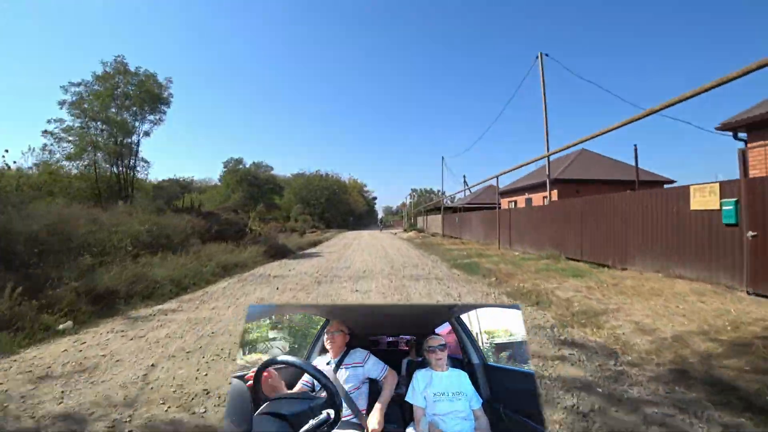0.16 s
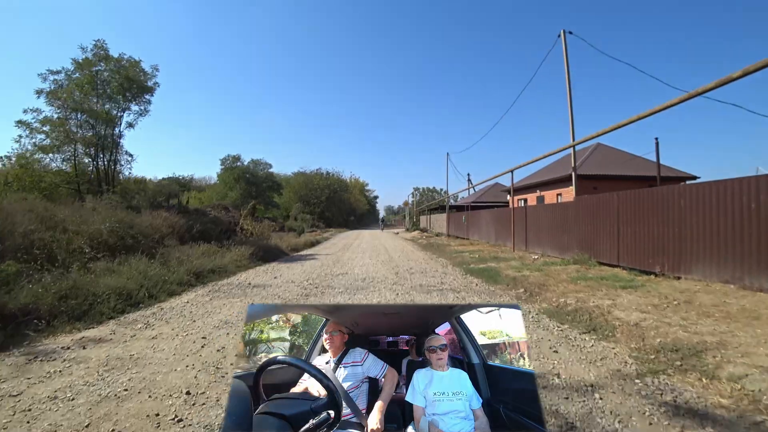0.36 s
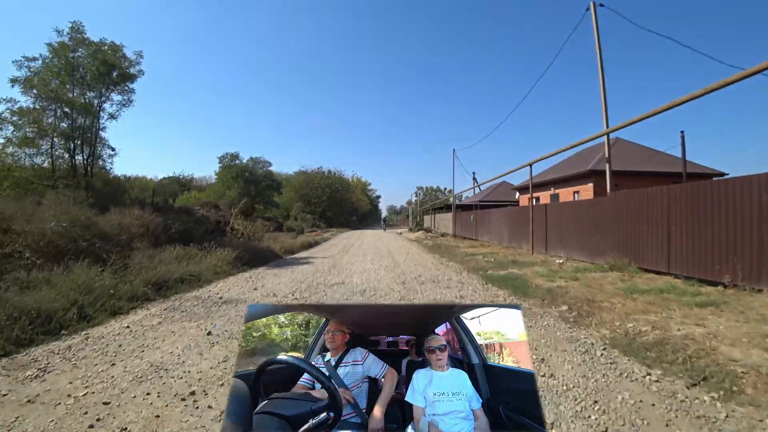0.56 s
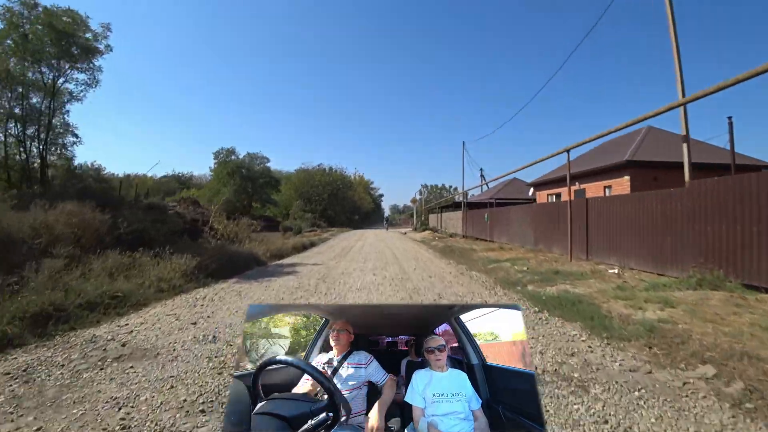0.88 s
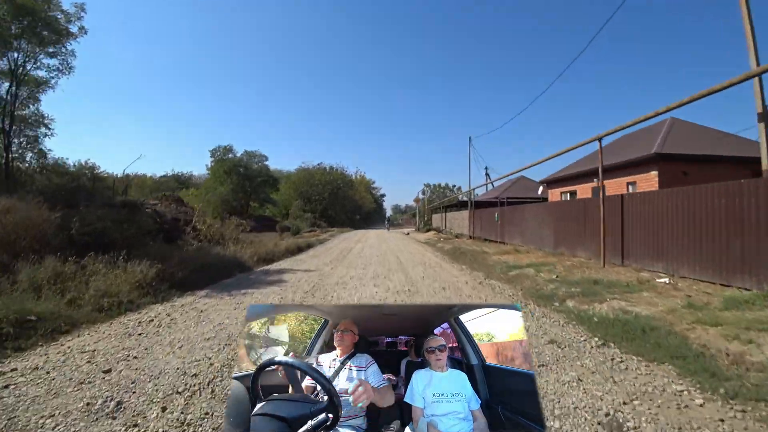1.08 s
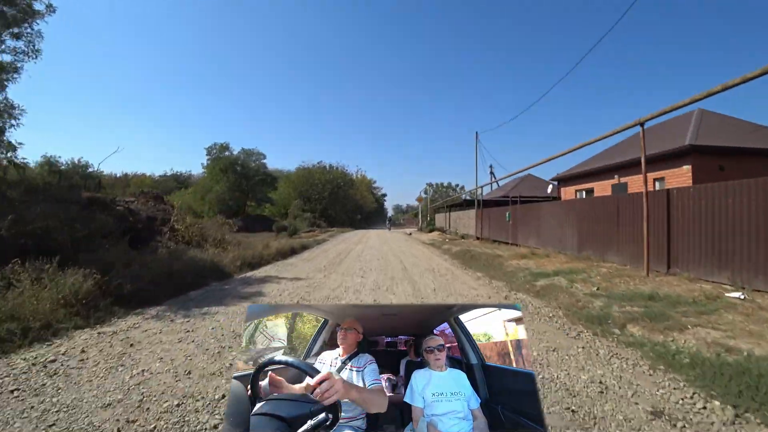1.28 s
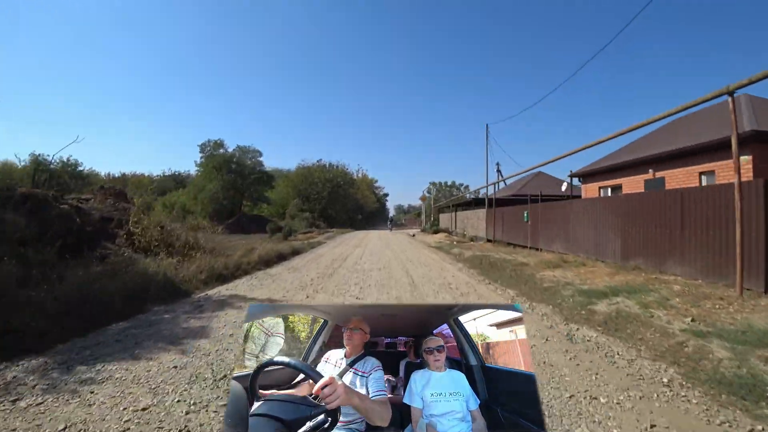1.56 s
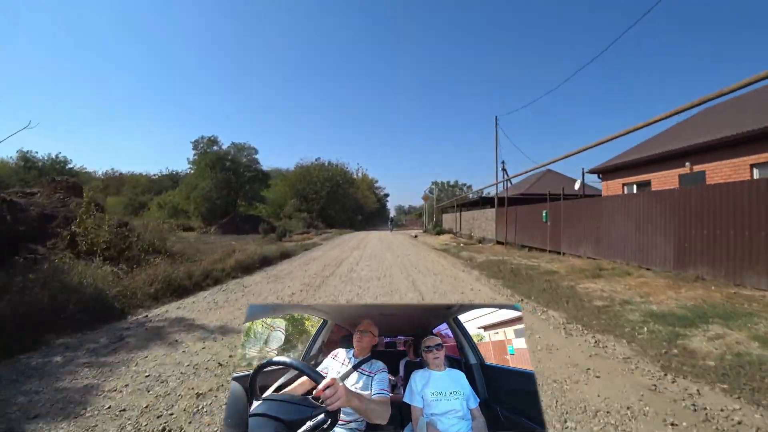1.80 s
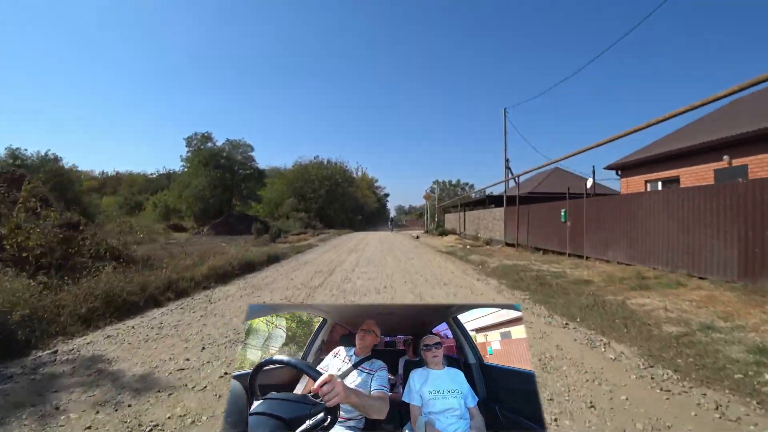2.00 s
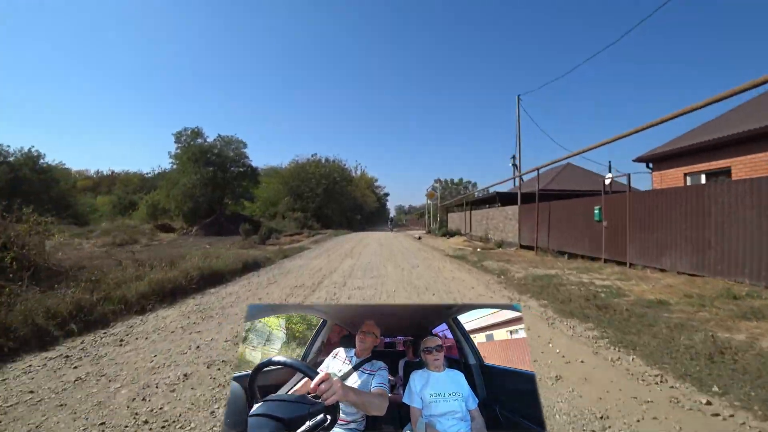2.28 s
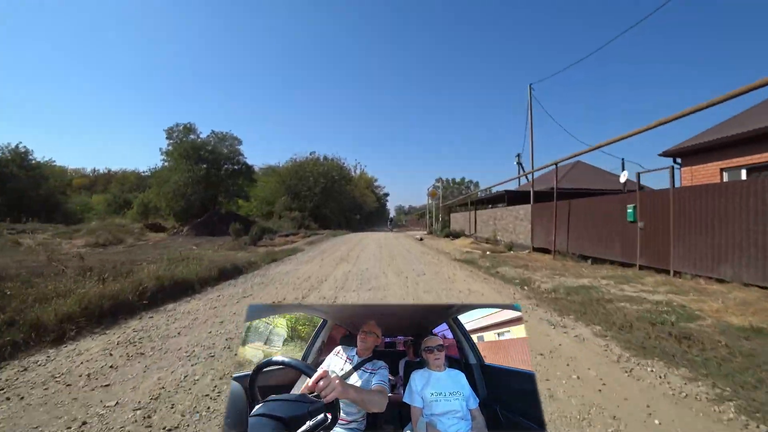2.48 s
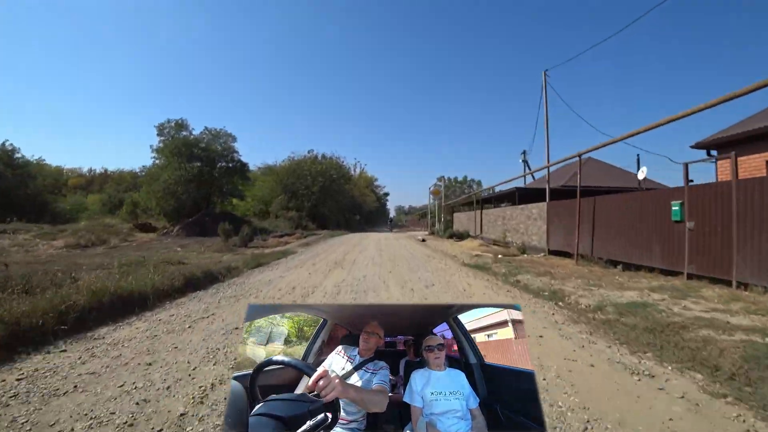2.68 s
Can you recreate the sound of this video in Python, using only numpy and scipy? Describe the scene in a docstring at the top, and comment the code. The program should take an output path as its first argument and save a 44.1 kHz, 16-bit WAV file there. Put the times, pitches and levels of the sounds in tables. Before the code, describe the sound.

A small car drives slowly along a gravel street, its deep boom and tyre rumble steady, while stones crack and tick against the floor pan; low air thumps buffet the microphone, mostly on the left.

```python
"""Inside a small car rolling slowly over gravel: resonant body boom, noise-like tyre and engine rumble, crunch.
Stones knock and crack on the floor pan (noise bursts plus ringing modes); a loose metal part jingles.
Filtered bursts make short low surges of the rumble; bumps hum as short low tones. Low noise buffeting differs
between the two microphone ports; at listed times the recorder narrows this low sound towards mono for a
moment, then reopens it. Bell-shaped thumps fall mostly on the left."""
import sys
import numpy as np
from scipy import signal
from scipy.fft import rfft, irfft
from scipy.io import wavfile
from scipy.ndimage import uniform_filter1d

SR = 44100
rng = np.random.default_rng(int(sys.argv[2]) if len(sys.argv) > 2 else 0)


def wrap_up_sound(samples):
    """Save the sound to the file named by the first command line argument, as 16-bit audio."""
    columns = np.atleast_2d(samples).T
    # keep every value between -1 and 1, then stretch to whole-number steps
    tamed = np.clip(columns, -1, 1)
    steps = np.round(tamed * 32767).astype(np.int16)
    wavfile.write(sys.argv[1], SR, steps)


def gain_from_decibels(decibels):
    """Convert decibel values to linear amplitude factors."""
    exponent = np.asarray(decibels, float) / 20
    return 10 ** exponent


N = 125685


def unit(x):
    """Scale to rms 1."""
    return x / np.sqrt(np.mean(x ** 2))


def decay(t, t60_s):
    """Exponential decay, 60 dB in t60_s."""
    return 1000.0 ** (-t / t60_s)


def log_axis(x):
    """log2 frequency of each rfft bin, offset by 1 Hz to keep DC finite."""
    return np.log2(np.arange(len(x) // 2 + 1) * SR / len(x) + 1)


def colour(x, table):
    """Filter by (frequency [Hz], gain [dB]) points joined on a log-frequency axis."""
    hz, db = np.array(table).T
    gain = gain_from_decibels(np.interp(log_axis(x), np.log2(hz), db))
    return irfft(rfft(x) * gain, len(x))


def bell_filter(x, centre_hz, above_octaves, below_octaves):
    """Lopsided Gaussian band-pass on the log-frequency axis."""
    off = log_axis(x) - np.log2(centre_hz)
    width = np.where(off > 0, above_octaves, below_octaves)
    return irfft(rfft(x) * np.exp(-0.5 * (off / width) ** 2), len(x))


def bell(t, width):
    """Gaussian pulse, width at half height."""
    return np.exp(-4 * np.log(2) * (t / width) ** 2)


def walk(per_s):
    """Smoothed random steps, per_s new levels a second."""
    k = SR // per_s
    steps = np.repeat(rng.standard_normal(N // k + 1), k)
    return uniform_filter1d(uniform_filter1d(steps, k), k)[:N]


def ring(modes, t):
    """Decaying modes; random phase, strength and slight detuning at each blow."""
    out = 0
    for hz, db, t60_s in modes:
        strength, phase, detune = rng.random(3) - 0.5
        tone = np.sin(2 * np.pi * (hz * (1 + 0.015 * detune) * t + phase))
        out = out + gain_from_decibels(db + 8 * strength) * tone * decay(t, t60_s)
    return out


def add(out, x, start_s):
    """Mix x into out at start_s, cut at the end."""
    i = int(start_s * SR)
    out[i:i + len(x)] += x[:N - i]


# road load: (time [s], boom level [dB], rumble level [dB], crunch level [dB])
ROAD_LOAD = [(0.0, -26, -9.5, -67), (0.018, -16.5, -25, -49.5), (0.35, -17.5, -23.5, -49.5),
             (0.54, -17, -23.5, -48.5), (0.59, -17.5, -23.5, -47.5), (1.09, -16, -25, -48.5),
             (1.19, -18.5, -27, -49.5), (1.45, -16.5, -24.5, -48), (1.7, -18.5, -22.5, -47.5),
             (1.99, -19, -24, -47), (2.06, -20, -17, -47.5), (2.11, -24.5, -23, -45.5),
             (2.16, -13.5, -26.5, -49.5), (2.22, -14, -23, -47.5), (2.29, -27, -22, -48),
             (2.36, -14.5, -23, -49.5), (2.44, -16.5, -23.5, -49), (2.54, -16.5, -27.5, -49.5),
             (2.61, -27.5, -24, -48.5), (2.65, -19, -27, -49), (2.85, -24.5, -25.5, -50)]


def road(column):
    """Gain of one road-load column, interpolated in dB."""
    table = np.array(ROAD_LOAD)
    return gain_from_decibels(np.interp(np.arange(N) / SR, table[:, 0], table[:, column]))


# body resonances: (frequency [Hz], bandwidth [Hz], level [dB])
BODY_RESONANCES = [(20.9, 9.8, 5), (29.3, 12.5, 0), (36.8, 4.2, -6.5), (65.3, 24, -13)]


def boom():
    """The road shakes low body resonances: noise through peak filters."""
    out = 0
    for hz, width_hz, db in BODY_RESONANCES:
        b, a = signal.iirpeak(hz, hz / width_hz, SR)
        out = out + gain_from_decibels(db) * unit(signal.lfilter(b, a, rng.standard_normal(N)))
    band = signal.butter(2, [15, 80], "band", fs=SR, output="sos")
    return unit(signal.sosfilt(band, out)) * road(column=1)


# rumble spectrum: (frequency [Hz], density [dB per Hz])
RUMBLE_SPECTRUM = [(35, 1), (60, 0), (92, 0), (113, -6), (152, -0.5), (335, -12), (368, -14.5), (439, -18),
                   (476, -18.5), (1000, -35), (1300, -45), (2200, -120)]


def rumble():
    """Tyre and engine rumble through the floor: coloured noise flickering in level."""
    flicker = gain_from_decibels(1.4 * (walk(per_s=20) + walk(per_s=40)))
    return unit(colour(rng.standard_normal(N) * flicker, RUMBLE_SPECTRUM)) * road(column=2)


# crunch spectrum: (frequency [Hz], density [dB per Hz])
CRUNCH_SPECTRUM = [(410, -81), (700, -6), (1010, -1), (1060, -9), (1180, -3.5), (1340, -10), (1740, -6.5),
                   (2170, -16.5), (2500, -13), (3000, -17), (10300, -31), (15700, -46)]
GRAINS_PER_S, GRAIN_T60_S = 400, 0.045
GRAIN_SPREAD_DB, GRAIN_TOP_DB = 9, 11
GRAIN_DB = -12  # all tails, re hiss


def crunch():
    """Gravel under the tyres: flickering hiss plus random grains with short noise tails."""
    grain_db = np.minimum(GRAIN_SPREAD_DB * rng.exponential(size=N), GRAIN_TOP_DB)
    hits = (rng.random(N) < GRAINS_PER_S / SR) * gain_from_decibels(grain_db)
    tails = signal.lfilter([1], [1, -decay(1 / SR, GRAIN_T60_S)], hits)
    envelope = gain_from_decibels(walk(per_s=12)) + gain_from_decibels(GRAIN_DB) * unit(tails)
    return unit(colour(rng.standard_normal(N) * envelope, CRUNCH_SPECTRUM)) * road(column=3)


# port-difference spectrum: (frequency [Hz], density [dB per Hz])
BUFFET_SPECTRUM = [(8.8, -30), (15, 4), (49, 0.5), (236, -7.5), (463, -23), (520, -28), (875, -26),
                   (1060, -42), (1290, -35), (1500, -43), (1950, -79), (3300, -120)]
BUFFET_DB = -21  # before flicker and folds
LINKED_DB, LINKED_LEAD_RAD = -2.5, 1  # part following the centre sound


def buffeting(centre):
    """Low pressure difference between the ports: flickering noise plus phase-led centre sound."""
    linked = (signal.hilbert(centre) * np.exp(1j * LINKED_LEAD_RAD)).real
    linked = signal.sosfiltfilt(signal.butter(2, 900, fs=SR, output="sos"), linked)
    free = unit(colour(rng.standard_normal(N), BUFFET_SPECTRUM))
    return (free * gain_from_decibels(BUFFET_DB) + gain_from_decibels(LINKED_DB) * linked) * gain_from_decibels(0.74 * walk(per_s=20))


# narrowing of the low sound: (start [s], length [s], level change of the difference [dB])
STEREO_FOLDS = [(0, 0.046, -14.5), (0.204, 0.063, -14.5), (0.348, 0.022, -1), (0.44, 0.02, -4),
                (0.684, 0.05, -11), (0.84, 0.026, -4), (0.932, 0.051, -15), (1.022, 0.055, -15),
                (1.313, 0.054, -14), (1.423, 0.046, -4.5), (1.556, 0.014, -19), (1.639, 0.032, -12),
                (1.721, 0.032, -15), (1.857, 0.028, -6), (1.925, 0.025, -20), (2.078, 0.052, -12),
                (2.157, 0.03, -22), (2.271, 0.031, -11), (2.357, 0.048, -15)]
FOLD_FALL_S, FOLD_RISE_S = 0.0059, 0.022


def stereo_folds():
    """The recorder narrows the low sound towards mono, then reopens it: gain of its port difference."""
    t, fold_db = np.arange(N) / SR, 0
    for start_s, length_s, change_db in STEREO_FOLDS:
        corners_s = [-FOLD_FALL_S, 0, length_s, length_s + FOLD_RISE_S]
        fold_db = fold_db + change_db * np.interp(t - start_s, corners_s, [0, 1, 1, 0])
    return gain_from_decibels(fold_db)


# port-difference thumps: (peak time [s], level [dB], push +1 or pull -1, width [ms])
AIR_THUMPS = [(0.1977, 2.5, 1, 4.8), (0.3313, 0.3, 1, 2.7), (0.4066, -7.5, -1, 3.6), (0.4235, -4.1, 1, 4.1),
              (0.4878, -7.4, 1, 3.1), (0.5134, -6.9, -1, 1.9), (0.521, -6.5, -1, 1.7),
              (0.5382, -3.6, 1, 2.4), (0.5628, -7.0, -1, 2.2), (0.6043, -5.7, 1, 3.4),
              (0.6174, -5.5, -1, 5.5), (0.6389, -4.5, 1, 3.2), (0.6759, -3.4, 1, 4.5),
              (0.8179, 4.3, 1, 4.9), (0.8839, -6.2, -1, 3.3), (0.9354, -2.2, -1, 6.8),
              (1.0187, 0.9, 1, 6.0), (1.3091, -3.0, -1, 5.1), (1.4012, -5.7, -1, 2.5),
              (1.5698, -2.5, -1, 4.8), (1.624, -0.0, -1, 5.6), (1.7061, 0.9, -1, 4.0),
              (1.8481, -3.5, 1, 2.7), (1.9102, -0.8, 1, 5.3), (1.9909, -1.6, -1, 4.5),
              (2.0541, 3.8, -1, 4.4), (2.1645, 1.9, 1, 4.3), (2.2437, -4.9, 1, 3.5), (2.3589, -1.5, 1, 6.0),
              (2.4322, -7.6, -1, 4.4), (2.4555, -4.3, 1, 4.0), (2.483, -6.1, -1, 3.9),
              (2.5046, -3.2, 1, 5.0), (2.6568, -6.3, 1, 4.4)]


def thumps():
    """Single strong pushes or pulls of air: slightly ragged bell pulses."""
    out, t = np.zeros(N), np.arange(-1024, 1024) / SR
    for peak_s, db, sign, width_ms in AIR_THUMPS:
        smooth = uniform_filter1d(uniform_filter1d(rng.standard_normal(len(t)), 40), 40)
        ragged = 1 + 0.094 * unit(smooth)
        add(out, sign * gain_from_decibels(db) * bell(t, width_ms / 1000) * ragged, peak_s - 1024 / SR)
    return out


# burst noise spectrum: (frequency [Hz], density [dB per Hz])
BURST_SPECTRUM = [(250, -24), (550, -13), (1550, 0.5), (2170, -10.5), (2680, -3.5), (3750, -13.5),
                  (4900, -10.5), (5710, -15), (6210, -8.5), (7350, -12.5), (15700, -22)]
# ringing pan modes: (frequency [Hz], level [dB], T60 [s])
PAN_RINGING = [(820, -1.5, .08), (1143, 3.5, .09), (1585, 1, 0.076), (2600, 1.5, 0.054), (3365, -4, 0.067),
               (4410, -9.5, 0.067), (6210, -10, 0.041), (6980, -15, 0.05), (8050, -8, 0.078),
               (10300, -1, 0.045), (12200, -11, .05)]
MODES_DB, BELOW_OCTAVES = -6.5, 0.42
ONSET_DB, ONSET_T60_S = 2, 0.025  # fast part, re slow part
ATTACK_S, SIDE_DB = 0.0008, -8  # shared with jingles; side = half the port difference


def bursts(rows):
    """Noise and pan modes, band-passed, with a fast and a slow decay. Returns centre, side."""
    out, t = np.zeros((2, N)), np.arange(8192) / SR
    for start_s, db, hz, octaves, t60_s in rows:
        fall = decay(t, t60_s) + gain_from_decibels(ONSET_DB) * decay(t, ONSET_T60_S)
        envelope = (1 - np.exp(-t / ATTACK_S)) * fall / 2
        for channel, channel_db in zip(out, (0, SIDE_DB)):
            noise = unit(colour(rng.standard_normal(len(t)), BURST_SPECTRUM))
            x = noise + gain_from_decibels(MODES_DB) * ring(PAN_RINGING, t)
            x = bell_filter(x, hz, octaves, BELOW_OCTAVES)
            x = x / np.std(x[:400]) / 2  # level set by the first 9 ms
            add(channel, gain_from_decibels(db + channel_db) * envelope * x, start_s)
    return out


# stone blows and rumble surges: (time [s], level [dB], pitch [Hz], spread above pitch [octaves], T60 [s])
BURSTS = [(0.2158, -21.5, 2360, 2.1, 0.088), (.332, -31, 447, 0.23, 0.13), (0.454, -48, 5850, 0.35, 0.053),
          (0.5163, -30, 700, 1.3, 0.079), (0.532, -38, 2600, 1.7, 0.43), (0.619, -31, 2600, 1.9, 0.11),
          (0.689, -45, 3000, 1.2, 0.064), (0.7676, -28.5, 2690, 3, 0.13), (0.782, -18.5, 2700, 2.2, 0.085),
          (0.7839, -21.5, 1390, 0.38, 0.13), (1.091, -40, 900, 3, 0.11), (1.263, -29, 330, 0.54, 0.11),
          (1.315, -55, 10500, .4, .07), (1.667, -41, 3000, 0.84, 0.069), (1.709, -45, 3000, 0.4, .05),
          (1.765, -51, 9000, .6, .02), (1.8, -27, 420, 0.44, 0.096), (1.837, -35, 2600, 2.6, 0.11),
          (1.928, -45, 2020, 1.2, 0.042), (1.9375, -32.5, 3700, 0.64, 0.046),
          (2.0, -45.5, 5900, 0.41, 0.12), (2.02, -29.5, 646, 0.46, 0.055), (2.062, -34, 1800, 1.53, .09),
          (2.065, -20.5, 640, 1.13, 0.1), (2.1447, -35, 1300, 0.7, 0.048), (2.33, -41, 620, .25, 0.15),
          (2.464, -44, 5360, 0.29, 0.045), (2.467, -24, 800, 0.6, 0.073), (2.474, -39, 2300, 0.85, .05)]
SURGE_TIMES_S = (0.332, 1.263, 1.8)
STONE_HITS = [row for row in BURSTS if row[0] not in SURGE_TIMES_S]
RUMBLE_SURGES = [row for row in BURSTS if row[0] in SURGE_TIMES_S]


def stones():
    """Stones crack on the pan and make it ring: low pitches knock, high ones tick."""
    return bursts(STONE_HITS)


def surges():
    """Short low surges of the road rumble: bursts band-passed at low pitch."""
    return bursts(RUMBLE_SURGES)


# floor hums: (peak time [s], level [dB], frequency at peak [Hz], width [s], glide [Hz/s])
FLOOR_BUMPS = [(0.494, -17, 140, 0.048, 100), (.54, -22, 221, 0.038, 600), (1.272, -26.5, 290.5, 0.034, 0),
               (2.015, -22, 150, .028, 0), (2.04, -18.5, 124, 0.03, 0)]


def bumps():
    """Bumps set the floor humming: bell-shaped swells of one low tone that may glide."""
    out = 0
    for peak_s, db, hz, width_s, glide_hz_per_s in FLOOR_BUMPS:
        t = np.arange(N) / SR - peak_s
        cycles = (hz + glide_hz_per_s * t / 2) * t + rng.random()
        out = out + gain_from_decibels(db) * bell(t, width_s) * np.sin(2 * np.pi * cycles)
    return out


# loose-metal jingles: (time [s], level [dB], gain of modes above 13 kHz [dB])
METAL_JINGLES = [(0.527, -52, -10), (0.541, -50, 6), (0.573, -45.5, -8), (0.6083, -32.5, 2),
                 (0.622, -40, -1), (1.83, -35.5, -6), (1.8385, -32.5, -9)]
# metal modes: (frequency [Hz], level [dB], T60 [s])
METAL_MODES = [(6100, -16, .05), (8500, 0, 0.045), (8990, -4, 0.065), (9550, -11, .05), (11800, -16, 0.04),
               (14780, -11, .075), (15020, -11, .075)]
RATTLE_S, RATTLE_TICKS = 0.012, 6
TICK_DB, TICK_T60_S = -6, 0.03


def jingles():
    """A loose metal part chatters on its seat: random ticks with high modes. Returns centre, side."""
    out, t = np.zeros((2, N)), np.arange(8192) / SR
    attack = 1 - np.exp(-t / ATTACK_S)
    for start_s, db, top_db in METAL_JINGLES:
        modes = [(hz, mode_db + top_db * (hz > 13000), t60_s) for hz, mode_db, t60_s in METAL_MODES]
        for late, size in rng.random((RATTLE_TICKS, 2)):
            for channel, channel_db in zip(out, (0, SIDE_DB)):
                tick = gain_from_decibels(TICK_DB) * rng.standard_normal(len(t)) * decay(t, TICK_T60_S)
                blow = size / 2 * (ring(modes, t) + tick) * attack
                add(channel, gain_from_decibels(db + channel_db) * blow, start_s + late * RATTLE_S)
    return out


def split(difference, left_share):
    """Share a port difference between left and inverted right."""
    return difference * np.array([[left_share], [left_share - 1]])


def scene():
    """Centre sound in both ports; buffeting and thumps fall mostly on the left."""
    burst_centre, burst_side = stones() + surges() + jingles()
    centre = boom() + rumble() + bumps() + crunch() + burst_centre
    wide = gain_from_decibels(-0.5) * crunch() + 2 * burst_side  # independent second crunch
    low_difference = buffeting(centre) * stereo_folds()
    out = centre + split(wide, 0.49) + split(low_difference, 0.83)
    return out + split(thumps(), 0.67)


def band_limit(x):
    """A steep low-pass at the top of the band."""
    return signal.sosfilt(signal.butter(12, 15820, fs=SR, output="sos"), x)


def record(dry):
    """Hard clipping at full scale."""
    mix = np.clip(dry, -1, 1)
    return band_limit(mix)


dry = scene()
out = record(dry)
wrap_up_sound(out)
```